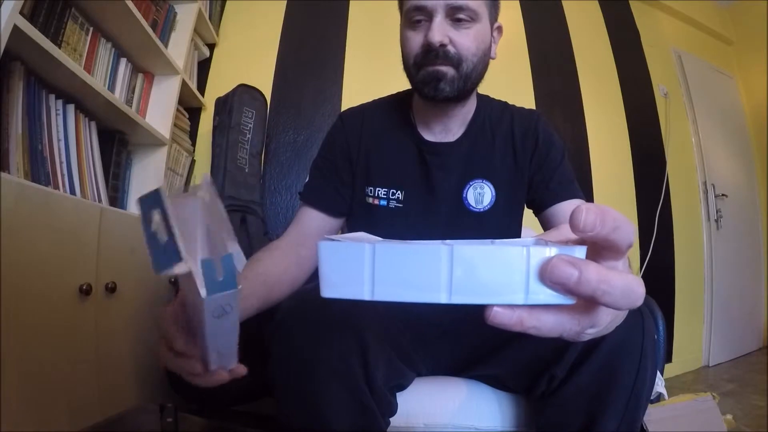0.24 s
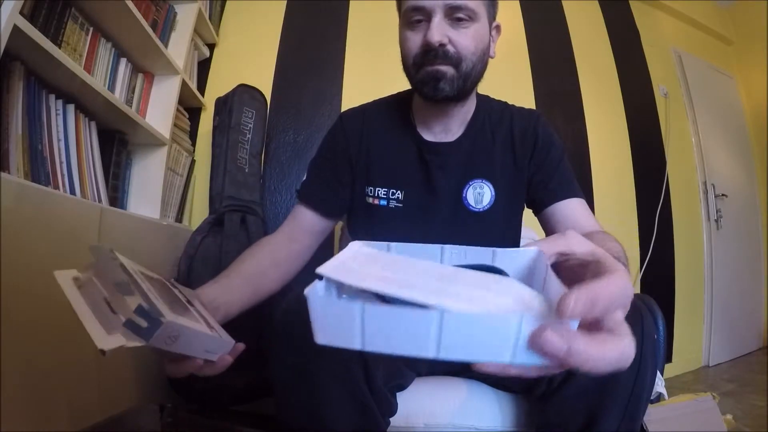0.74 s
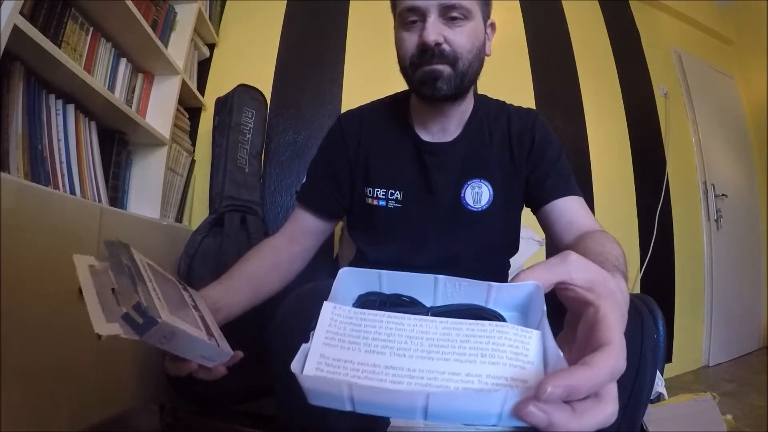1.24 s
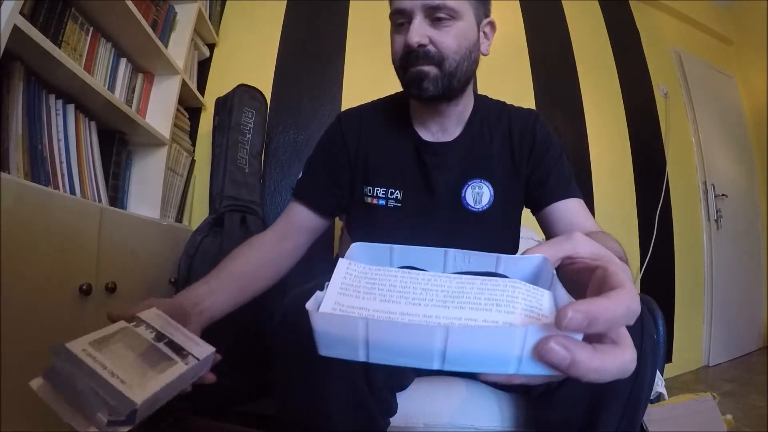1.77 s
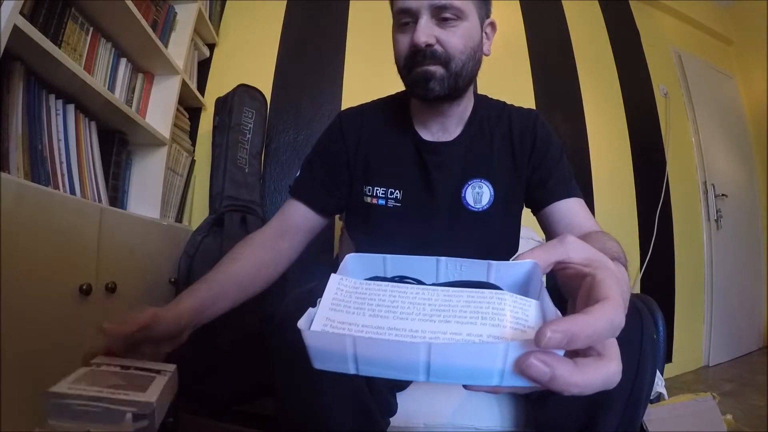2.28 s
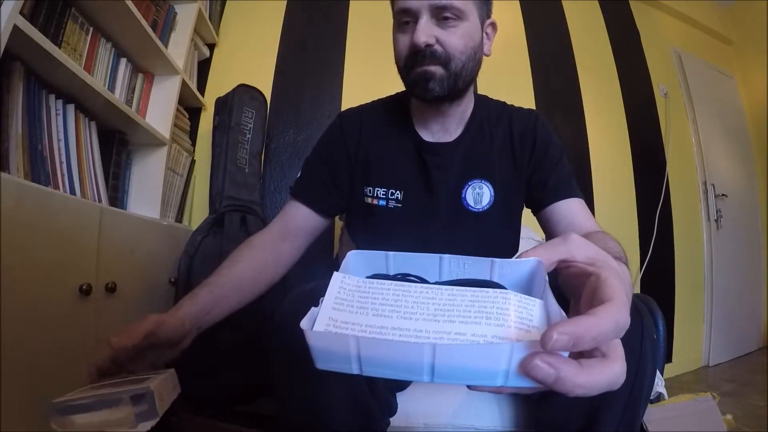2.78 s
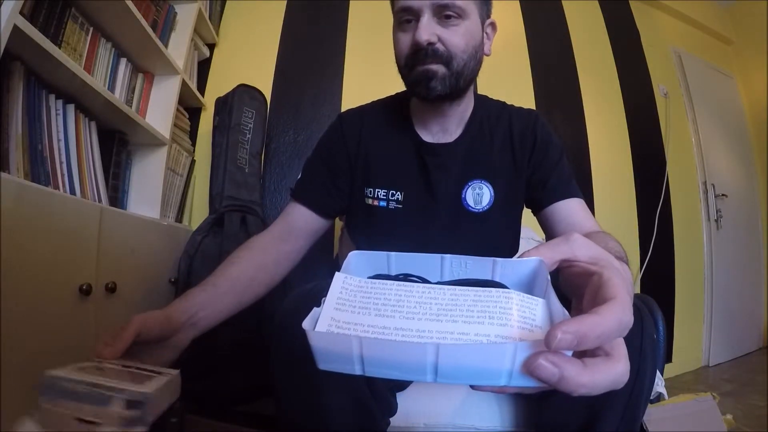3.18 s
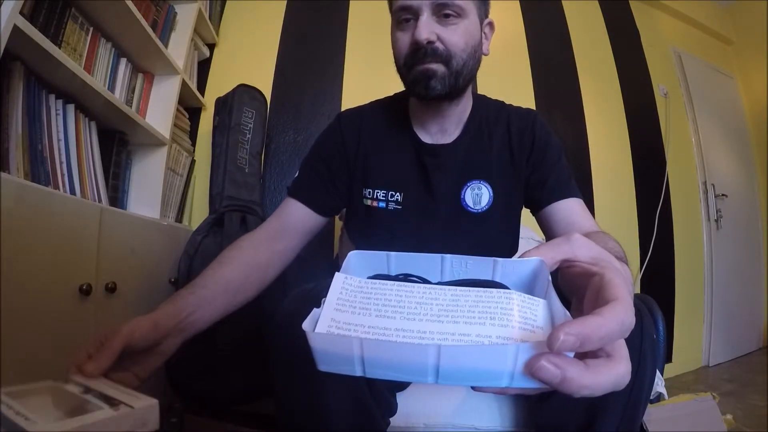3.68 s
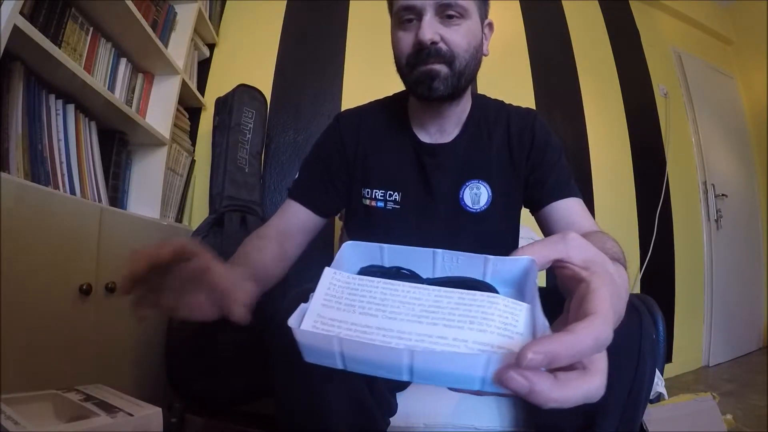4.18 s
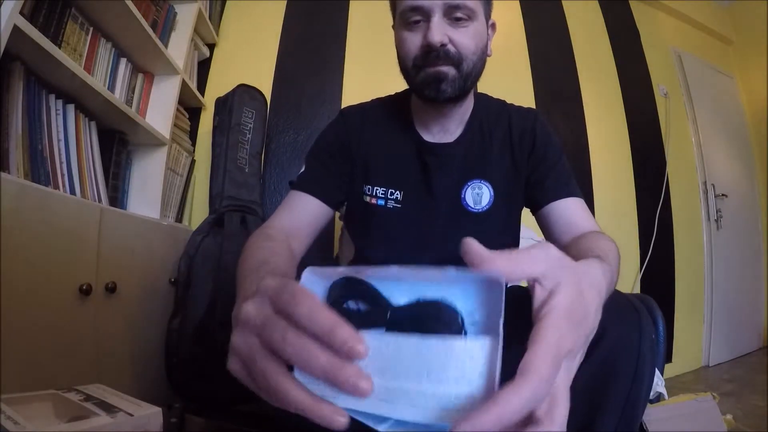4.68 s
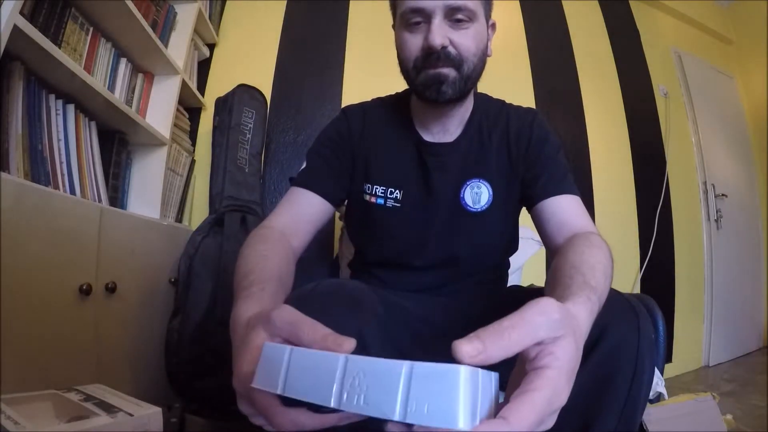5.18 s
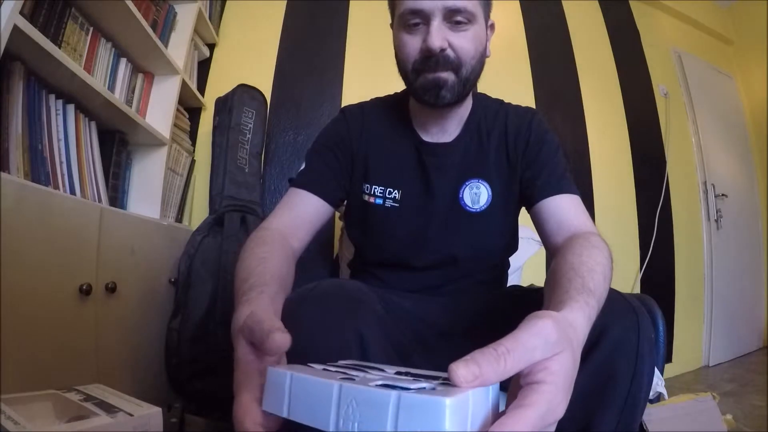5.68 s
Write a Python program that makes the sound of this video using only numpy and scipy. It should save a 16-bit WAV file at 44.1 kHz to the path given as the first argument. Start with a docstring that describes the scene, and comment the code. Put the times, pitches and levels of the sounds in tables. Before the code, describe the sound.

Hollow box taps and scrapes on a wooden surface, a pause, then sharp plastic pops and soft crackling over faint hiss.

```python
"""A small furnished room, one microphone with hiss and rumble, a wooden surface and two objects on it.
A thin plastic tray crackles faintly; a small cardboard carton is set down, rocked and nudged on the wood;
then the tray is gripped and turned over, snapping and crinkling. Blows ring banks of dying modes, sliding
and flexing drive the same modes with random stick-slip clicks, and brushing is filtered clicks.
Two sets of sparse random reflections, crossfading in turn, place carton, tray and brushing in the room."""
import sys
import numpy as np
from scipy import signal
from scipy.io import wavfile
from scipy.ndimage import uniform_filter1d

SR = 44100
rng = np.random.default_rng(int(sys.argv[2]) if len(sys.argv) > 2 else 0)


def wrap_up_sound(samples):
    """Save the sound to the file named by the first command line argument, as 16-bit audio."""
    columns = np.atleast_2d(samples).T
    # keep every value between -1 and 1, then stretch to whole-number steps
    tamed = np.clip(columns, -1, 1)
    steps = np.round(tamed * 32767).astype(np.int16)
    wavfile.write(sys.argv[1], SR, steps)


N = 261506  # length in samples

# Push of a whole object on the air. Each row: mode in Hz, relative level in dB, free decay by 60 dB in seconds.
HOLLOW_MODES = [(127, 5, 0.085), (161.8, -6.5, 0.2), (217, 3, 0.069), (329, -2, 0.062)]
# Bending modes of the tray. Each row: mode in Hz, relative level in dB, free decay by 60 dB in seconds.
TRAY_MODES = [(402.5, 13, 0.17), (571, 7.5, 0.058), (701, 1, 0.078), (809, 2, 0.093), (910, -8, 0.05),
              (1268, -2, 0.031), (1440, -10, 0.052), (1686, -2, 0.034), (1832, -3, 0.014),
              (2230, -10, 0.054), (2210, -15.5, 0.082), (2490, -2, 0.054), (2800, 5, 0.049),
              (3310, 4.5, 0.071), (3670, 5.5, 0.07), (4420, 3, 0.026), (5260, 8, 0.06)]
# Wall modes of the carton. Each row: mode in Hz, relative level in dB, free decay by 60 dB in seconds.
CARTON_MODES = [(249, 0.5, 0.19), (391, -2, 0.11), (477, -1, 0.052), (537, -3, 0.13), (621, 1.5, 0.039),
                (661, 2.5, 0.04), (810, -4.5, 0.074), (907, 2.5, 0.027), (918, -3.5, 0.081),
                (1065, 0.5, 0.022), (1383, 9.5, 0.012), (1490, -1, 0.042), (1884, 3.5, 0.026),
                (2024, 12, 0.013), (2014, 3.5, 0.04), (2550, 1, 0.014), (2740, -19, 0.025)]
# Carton knocks. Each row: start in seconds, peak of the ring in dB, low and high pitch favoured by the
# struck spot in Hz, high re low in dB, edge crack in dB re peak, low thump in dB re peak.
CARTON_KNOCKS = [(1.817, -49, 790, 1300, -12, -7, -10), (1.835, -39, 577, 1010, -2, -29, -2.5),
                 (1.872, -38, 534, 1000, -2.5, -6, -27), (1.973, -48.5, 557, 1350, -1, -17, -12),
                 (2.028, -14.5, 610, 1300, -6.5, -4, -14.5), (2.058, -35.5, 397, 2250, -5, -21, -13),
                 (2.116, -34.5, 680, 1380, -6, -30, -14), (2.152, -28.5, 262, 1200, -4, -13.5, -31),
                 (2.183, -48, 250, 1350, -18.5, 2.5, -21), (2.296, -18, 650, 1400, -1, -17, -8.5),
                 (2.319, -26, 536, 1080, 1, -38, -5.5), (2.343, -39.5, 262, 1500, -9, -28, -19),
                 (2.372, -35, 553, 1390, -21, -9, -20), (2.591, -23.5, 532, 1670, -8, -5, -12.5),
                 (2.613, -42.5, 477, 1410, 6, -14, -2), (2.63, -39, 530, 1390, -4, 0, -17),
                 (2.685, -16.5, 680, 1620, -10.5, -13, -16), (2.695, -21, 810, 1600, -1, -33, -12.5),
                 (2.715, -29.5, 377, 1870, -22, -8.5, -13), (2.762, -37, 543, 1540, 5, -3, 4.5),
                 (2.773, -20, 540, 1610, -2, -14.5, -18), (2.803, -29, 584, 1390, -19, -19, -13),
                 (2.87, -29.5, 500, 1760, -5, -6.5, -10.5), (2.88, -36.5, 517, 1440, 14, -5, -34),
                 (2.976, -31.5, 564, 1570, 1, -8, -33), (2.984, -25, 615, 1400, -1.5, -16.5, -13.5),
                 (3.01, -30.5, 604, 1390, -20, -32, -10), (3.08, -47, 478, 1290, 8, -8, -26),
                 (3.191, -32.5, 473, 1780, -22, -18.5, -10), (3.202, -29, 655, 1440, -12, -21, -13),
                 (3.657, -34.5, 507, 1050, -20, -10, -21), (3.66, -16, 480, 1090, -7, -21, -11.5),
                 (3.673, -33.5, 530, 1020, 14, 0, -26), (3.683, -25.5, 970, 1140, 20, -12, -32),
                 (3.774, -34.5, 890, 1130, -5, -6, -20.5), (3.801, -18.5, 935, 1470, 8, -16.5, -10.5),
                 (3.829, -27.5, 416, 1290, -37, -31, -7), (3.849, -20, 467, 1660, -1, -17, -20),
                 (3.864, -40.5, 373, 1380, -23, -25, -26), (3.922, -26.5, 490, 1360, 3, -10, -10),
                 (3.946, -35.5, 452, 1630, -30, -35, -2), (4.011, -35, 428, 1070, -12.5, -18, -30)]


def gain_of(db):
    """Converts dB to an amplitude gain."""
    return 10 ** (np.asarray(db) / 20)


def evened(x):
    """Scales to rms 1."""
    return x / np.sqrt(np.mean(x ** 2) + 1e-20)


def peaked(x):
    """Scales to peak 1."""
    return x / abs(x).max()


def read(points, hz):
    """Reads a spectrum on a log-frequency axis."""
    point_hz, value = np.transpose(points)
    return np.interp(np.log(hz + 1), np.log(point_hz + 1), value)


def add(mix, start_s, sound):
    """Mixes a sound in at its start time."""
    part = mix[round(start_s * SR):][:len(sound)]
    part += sound[:len(part)]


def bandpassed(x, order, band_hz):
    """Keeps one band of frequencies."""
    return signal.sosfilt(signal.butter(order, band_hz, "band", fs=SR, output="sos"), x)


def favour(hz, centre_hz, octaves):
    """Gain of a mode by its distance in octaves from the favoured pitch."""
    return 1 / (1 + (np.log2(hz / centre_hz) / octaves) ** 2)


def ring(modes, weights, ring_share=0.47, rise_cycles=0.59):
    """One blow: weighted dying sines that build up over about a cycle, slightly detuned by the grip; peak 1."""
    t = np.arange(5000) / SR
    hz, db, t60 = np.transpose(modes)[:, :, None]
    hz = hz * (1 + 0.012 * rng.standard_normal(hz.shape))
    phase = 2 * np.pi * rng.random(hz.shape)
    decay = gain_of(db - 60 * t / (t60 * ring_share))
    rise = 1 - np.exp(-t * hz / rise_cycles)
    return peaked(weights @ (decay * rise * np.sin(2 * np.pi * hz * t + phase)))


def tick(hz, decay_s):
    """The edge contact: a broad noisy crack around hz; peak 1."""
    rise_s, spread_db = 0.00048, -32.0
    t = np.arange(1500) / SR
    burst = rng.standard_normal(len(t)) * np.exp(-t / decay_s) * (1 - np.exp(-t / rise_s))
    core = bandpassed(burst, 2, np.clip([hz / 1.5, hz * 1.35], 100, SR / 2.2))
    return peaked(core + gain_of(spread_db) * burst)  # a little of it spreads over the whole treble


def chattered(sound):
    """Loose flaps chatter after a blow: small dying after-taps of random size and sign; peak 1."""
    tap_db, decay_s, taps_per_s = -16, 0.019, 700
    t = np.arange(4000) / SR
    size = gain_of(tap_db) * rng.standard_normal(len(t)) * np.exp(-t / decay_s)
    taps = size * (rng.random(len(t)) < taps_per_s / SR)
    return peaked(signal.fftconvolve(sound, (t == 0) + taps))


def blows(rows, modes, thump_modes, octaves, tick_s, tick_hz, ring_share_at):
    """Each blow gives a crack, a thump and the same modes, weighted towards two favoured pitches."""
    out, mode_hz = np.zeros(N), np.transpose(modes)[0]
    for start_s, db, low_hz, high_hz, high_db, tick_db, thump_db in rows:
        scatter_db = 2.5 * rng.standard_normal(len(modes))  # no two blows excite the modes alike
        low = favour(mode_hz, low_hz, octaves) ** 2
        high = gain_of(high_db) * favour(mode_hz, high_hz, octaves) ** 2
        body = ring(modes, (low + high) * gain_of(scatter_db), ring_share_at(start_s))
        thump = ring(thump_modes, np.ones(len(thump_modes)))
        add(out, start_s, gain_of(db) * chattered(body))
        add(out, start_s, gain_of(db + tick_db) * tick(tick_hz, tick_s))
        add(out, start_s, gain_of(db + thump_db) * thump)
    return out


def slips(per_s, spread_db):
    """Random stick-slip clicks of uneven size and either sign."""
    size = gain_of(spread_db * np.minimum(rng.exponential(1, N), 4))
    return size * rng.choice([-1, 1], N) * (rng.random(N) < per_s / SR)


def stroke(strokes, column):
    """Interpolates one column along the strokes; also gives a soft gate that is open inside them."""
    t = np.arange(N) / SR
    rows = np.concatenate(strokes)
    value = np.interp(t, rows[:, 0], rows[:, column])
    inside = sum((t > points[0][0]) & (t < points[-1][0]) for points in strokes)
    return value, uniform_filter1d(inside * 1.0, 1300)


def rub(strokes, modes, per_s, spread_db, octaves, ring_share):
    """Slips drive every mode, damped by the hand; each mode takes its own share of the slips."""
    level_db, inside = stroke(strokes, 1)
    centre_hz = stroke(strokes, 2)[0]
    drive, out, power = slips(per_s, spread_db), np.zeros(N), 0
    for hz, db, t60 in modes:
        radius = 10 ** (-3 / (t60 * ring_share * SR))  # two-pole resonator
        poles = [1, -2 * radius * np.cos(2 * np.pi * hz / SR), radius * radius]
        mode = signal.lfilter([1], poles, drive * rng.standard_normal(N))
        weight = gain_of(db) * favour(hz, centre_hz, octaves)
        out += weight * evened(mode)
        power = power + weight ** 2
    return gain_of(level_db) * inside * out / np.sqrt(power)


def air():
    """Microphone hiss and low room rumble: noise shaped by a spectrum, slightly patchy in time and pitch."""
    # Spectrum of the still air. Each row: frequency in Hz, relative level in dB per Hz.
    air_spectrum = [(12, -1.5), (20, 20), (44, 1.5), (120, -10), (154, -9.5), (216, -14), (367, -19),
                    (624, -21), (849, -23.5), (1000, -22.5), (1220, -25), (3160, -27), (14700, -39.5),
                    (16000, -48)]
    level_db, patch_db = -57.5, 1.1
    frames, hz = N // 256 + 5, np.fft.rfftfreq(1024, 1 / SR)
    real, imaginary, patches = rng.standard_normal((frames, 513, 3)).T
    patches = uniform_filter1d(patches, 40, 0)  # over frequency
    patches = evened(uniform_filter1d(patches, 8, 1))  # over time
    shape = gain_of(read(air_spectrum, hz)[:, None] + patch_db * patches)
    noise = signal.istft((real + 1j * imaginary) * shape, nperseg=1024, noverlap=768)[1][:N]
    return gain_of(level_db) * evened(noise)


def room(x):
    """Reflections: sparse taps of random sign, each band dying at its own speed."""
    # Decay of the furnished room. Each row: frequency in Hz, decay by 60 dB in seconds.
    room_decay = [(150, 0.4), (500, 0.17), (1500, 0.27), (4000, 0.4), (10000, 0.033)]
    taps = np.zeros(SR // 2)
    at = np.arange(200, SR // 2 - 20, 20)
    taps[at + rng.integers(0, 20, len(at))] = rng.choice([-1.0, 1.0], len(at))
    hz, t, bands = signal.stft(taps, SR, nperseg=256)
    decay = gain_of(-60 * t / read(room_decay, hz)[:, None])
    tail = signal.istft(bands * decay, SR, nperseg=256)[1]
    return signal.fftconvolve(x, tail / np.linalg.norm(tail))[:N]


def alternating_room(x):
    """Two sets of random reflections crossfade in turn, so the reverberation keeps no one fixed colour."""
    half_turn_s = 0.31
    turn = np.pi * np.arange(N) / SR / half_turn_s
    return room(x * np.cos(turn)) + room(x * np.sin(turn))


def thuds():
    """The wood under the carton booms low at some of the knocks, as a pair of low dying modes."""
    # Modes of the wooden surface. Each row: mode in Hz, relative level in dB, free decay by 60 dB in seconds.
    wood_modes = [(58, -7.5, 0.57), (75, -14.5, 0.54)]
    # Low booms of the wood. Each row: start in seconds, peak in dB.
    wood_booms = [(2.153, -48), (2.184, -46), (2.319, -54), (2.593, -38.5), (2.63, -40.5), (2.684, -45),
                  (2.872, -38.5), (2.986, -54), (3.66, -46)]
    out = np.zeros(N)
    for start_s, db in wood_booms:
        add(out, start_s, gain_of(db) * ring(wood_modes, np.ones(len(wood_modes))))
    return out


def brush():
    """Cardboard, paper and plastic brushing: dense tiny slips heard as treble grit, in strokes and scuffs."""
    # Slow brushing strokes, a list of rows for each. Each row: time in seconds, level in dB.
    brush_strokes = [
        [(0.85, -79), (0.97, -66), (1.04, -84)],
        [(1.8, -103), (1.844, -60.5), (1.9, -67.5), (2.016, -72), (2.12, -93), (2.2, -65), (2.5, -70),
         (2.86, -77.5), (3.258, -71), (3.3, -74)],
        [(3.64, -94), (3.75, -59), (3.88, -77), (4.05, -77)],
        [(4.55, -75), (4.8, -62), (4.976, -73.5), (5.11, -64.5), (5.14, -78), (5.358, -78), (5.562, -64),
         (5.778, -76), (5.93, -83)],
    ]
    # Short scuffs at sharp contacts. Each row: start in seconds, level in dB before rise and fade.
    sharp_scuffs = [(2.159, -57.5), (2.296, -55), (2.59, -53), (2.87, -58.5), (3.674, -46.5), (3.8, -72),
                    (3.847, -54.5), (4.567, -46), (4.809, -56), (5.374, -61.5), (5.572, -52)]
    rise_s, fade_db_per_s = 0.0015, 561
    level_db, inside = stroke(brush_strokes, 1)
    level, t = gain_of(level_db) * inside, np.arange(SR // 4) / SR
    for start_s, db in sharp_scuffs:
        add(level, start_s, gain_of(db - fade_db_per_s * t) * np.minimum(t / rise_s, 1))
    return level * evened(bandpassed(slips(3700, 5.1), 1, [4000, 11000]))


def crinkle():
    """The tray flexing: slips in the thin plastic drive its strongly damped modes."""
    # Flexing strokes, a list of rows for each. Each row: time in seconds, level in dB.
    flex_strokes = [
        [(0.75, -67), (0.818, -69), (0.884, -76), (0.92, -57.5), (1.164, -83)],
        [(4.52, -84), (4.614, -49), (4.712, -62.5), (4.746, -52), (4.844, -53.5), (4.884, -61), (5.02, -61.5),
         (5.296, -65.5), (5.33, -66), (5.452, -57.5), (5.566, -56.5), (5.738, -61), (5.93, -68.5)],
    ]
    favoured_hz = 1500
    strokes = [[(s, db, favoured_hz) for s, db in points] for points in flex_strokes]
    return rub(strokes, TRAY_MODES, per_s=800, spread_db=4.0, octaves=0.69, ring_share=0.16)


def snaps():
    """The tray's panels buckle: sudden cracks that ring its modes, shortened by the hand."""
    # Tray snaps. Each row: start in seconds, peak of the ring in dB, low and high pitch favoured by the
    # buckling panel in Hz, high re low in dB, edge crack in dB re peak, low thump in dB re peak.
    tray_snaps = [(0.936, -51, 1410, 2480, -3, 2, -25), (0.947, -42, 1300, 3760, 16, -9, -31),
                  (0.967, -39, 1450, 3400, -10.5, -16, -18), (0.983, -36, 580, 1760, 21, -10, -7),
                  (0.994, -42.5, 1250, 1650, -7, 1, -7), (1.083, -54, 1070, 1620, 6, -23, -17),
                  (1.235, -54, 1400, 1700, 9, -14, -15), (1.244, -47, 726, 1960, 10, -10.5, -21),
                  (1.449, -52.5, 1280, 2500, -10, 2, -22), (4.565, -29.5, 1250, 1630, -4, -8, -19),
                  (4.57, -10, 1280, 1720, 2.5, -19, -32.5), (4.582, -35, 990, 1910, 14, -7, -11),
                  (4.591, -48, 786, 2440, -8, -23, -38), (4.617, -52, 1250, 1810, 2.5, -26, -24),
                  (4.628, -50, 1180, 1700, 3, -3, -19), (4.646, -35.5, 1190, 1780, 9, 1.5, -24),
                  (4.707, -44.5, 1180, 1810, 11, 2.5, -22), (4.715, -47, 1310, 1580, 6, -5, -38),
                  (4.75, -40.5, 810, 1740, 13, -3, -22), (4.781, -57, 1390, 1560, 15, -3, -31),
                  (4.797, -34, 720, 2830, -1, -4, -19), (4.805, -21.5, 694, 1710, 12, -2.5, -31),
                  (4.832, -46, 824, 1610, 2, 2, -1), (4.843, -34, 530, 1880, 13, -17, -29),
                  (4.864, -35, 746, 1830, 9, -10, -14), (4.873, -30.5, 826, 1760, 20, -14.5, -21),
                  (5.025, -51, 920, 1820, 3, -10, -30), (5.06, -49, 910, 1820, 13, -15, -25),
                  (5.096, -65, 1400, 2910, -5, -8, -25), (5.168, -47, 775, 1710, 13, -20.5, -26),
                  (5.218, -42.5, 1400, 2760, -22, -8, -26), (5.232, -57, 1400, 2480, 3, -4, -22),
                  (5.302, -66, 1400, 2500, 4, -8, -20), (5.375, -30.5, 2100, 4420, -20.5, -7, -27),
                  (5.445, -44, 680, 1440, 8, 1, -23), (5.5, -39.5, 760, 1380, 24, -3, -12),
                  (5.514, -47, 770, 1410, 16, 1, -9), (5.551, -35, 685, 1460, 7, -4, -12),
                  (5.574, -32.5, 780, 1330, 32, -6.5, -12.5), (5.641, -48.5, 785, 1470, 9.5, -11, -25),
                  (5.694, -50, 760, 1390, 15, 0, -25)]
    in_hand = 0.58  # share of the free ring time
    return blows(tray_snaps, TRAY_MODES, HOLLOW_MODES, octaves=0.4, tick_s=0.0025, tick_hz=4540,
                 ring_share_at=lambda s: in_hand)


def drag():
    """The carton dragged a little: fast slips make a soft moan that swells, holds and stops."""
    start_s, rise_s, hold_s, level_db, favoured_hz = 2.42, 0.068, 0.072, -51, 614
    full_s = start_s + rise_s
    rows = [(start_s, level_db - 21, favoured_hz),
            (full_s, level_db, favoured_hz),
            (full_s + hold_s, level_db - 3, favoured_hz)]
    return rub([rows], CARTON_MODES, per_s=3100, spread_db=-2.5, octaves=0.3, ring_share=0.73)


def skid():
    """The carton's edge skids and its flaps rattle after each knock: dense slips in the upper middle."""
    rattle_db, fade_db_per_s = -42.5, 242  # rattle level is re the knock's peak
    level, t = np.zeros(N), np.arange(SR // 4) / SR
    for start_s, db, *_ in CARTON_KNOCKS:
        add(level, start_s, gain_of(db + rattle_db - fade_db_per_s * t))
    return level * evened(bandpassed(slips(4000, 3.6), 2, [2000, 4500]))


def slide():
    """The carton sliding on the wood: uneven slips drive its modes around a wandering pitch."""
    # Sliding strokes, a list of rows for each. Each row: time in seconds, level in dB, favoured pitch in Hz.
    slide_strokes = [
        [(1.78, -67.5, 517), (1.992, -66.5, 640), (2.104, -52, 664), (2.168, -40.5, 386), (2.24, -55.5, 463),
         (2.392, -55, 504), (2.58, -78, 520), (2.75, -49.5, 570), (2.956, -68, 600), (3.024, -50, 560),
         (3.128, -67, 513), (3.304, -55, 625), (3.36, -102, 500)],
        [(3.62, -82, 517), (3.714, -72, 499), (3.776, -41.5, 610), (3.832, -44.5, 420), (4.008, -61.5, 472),
         (4.074, -62, 470), (4.2, -81, 380)],
    ]
    return rub(slide_strokes, CARTON_MODES, per_s=610, spread_db=3, octaves=0.6, ring_share=0.63)


def knocks():
    """The carton knocking on the wood: its walls ring, and its hollow body and inner air thump."""
    # Air inside the carton. Each row: mode in Hz, relative level in dB, free decay by 60 dB in seconds.
    cavity_modes = [(246, -2.5, 0.25), (415.7, -4.5, 0.2)]
    # Shares of the free ring time: held loosely, then gripped for the last push.
    loose, gripped, gripped_from_s = 0.8, 0.44, 3.5
    return blows(CARTON_KNOCKS, CARTON_MODES, [*HOLLOW_MODES, *cavity_modes], octaves=0.55,
                 tick_s=0.0024, tick_hz=3400,
                 ring_share_at=lambda s: loose if s < gripped_from_s else gripped)


def scene():
    """Carton, tray and brushing, each with its share of room, over the wood's booms and the still air."""
    grit = brush()
    tray = crinkle() + snaps()
    carton = drag() + skid() + slide() + knocks()
    wet = alternating_room(gain_of(-13) * carton + gain_of(-14.5) * tray + gain_of(-6) * grit)
    return (carton + tray + grit + wet + thuds() + air())[None]


def record(dry):
    """Limits the band with a steep low-pass at 15.6 kHz."""
    lowpass = signal.firwin(511, 15600, window=("kaiser", 9), fs=SR)
    return signal.oaconvolve(dry, lowpass[None], "same")


dry = scene()
out = record(dry)
wrap_up_sound(out)
```